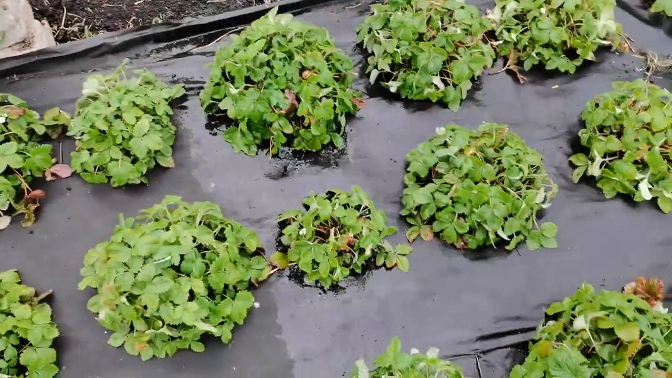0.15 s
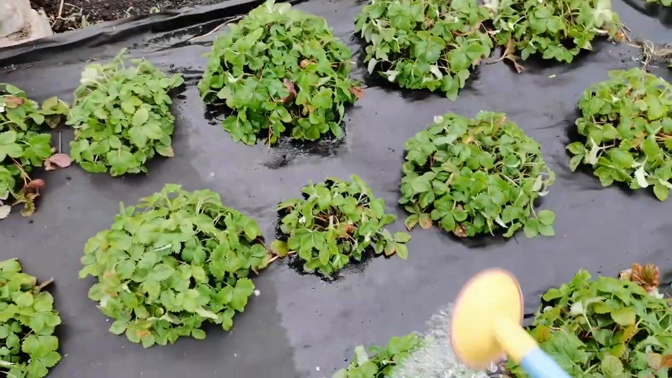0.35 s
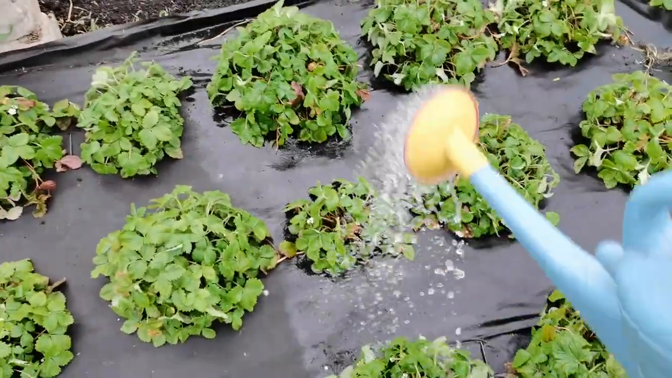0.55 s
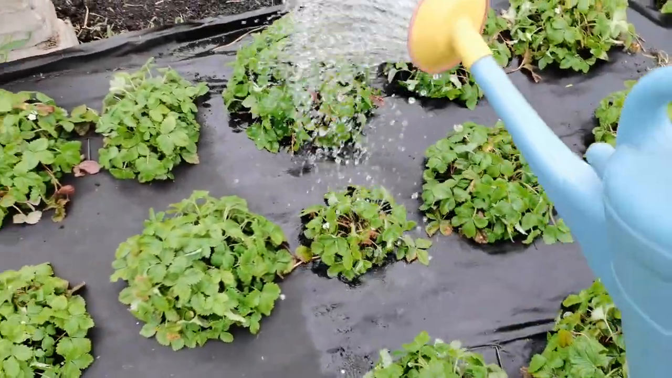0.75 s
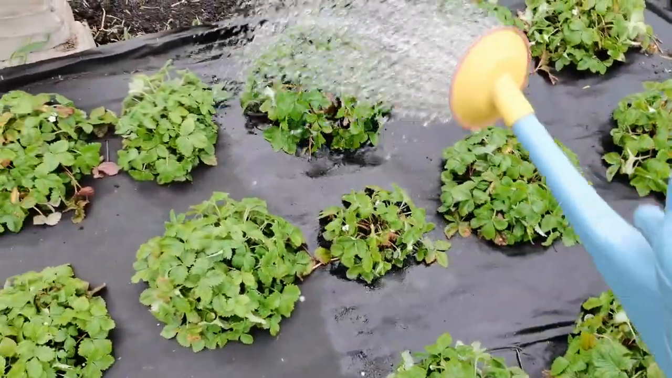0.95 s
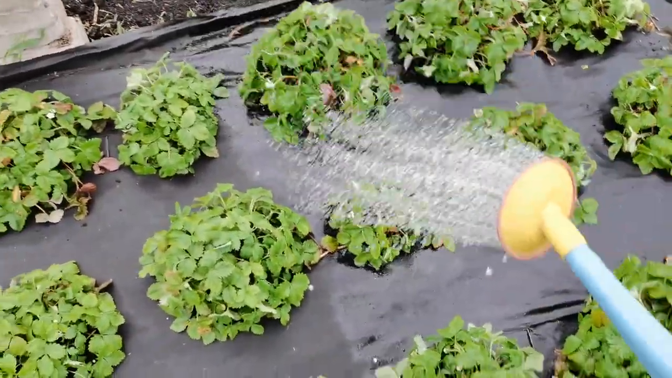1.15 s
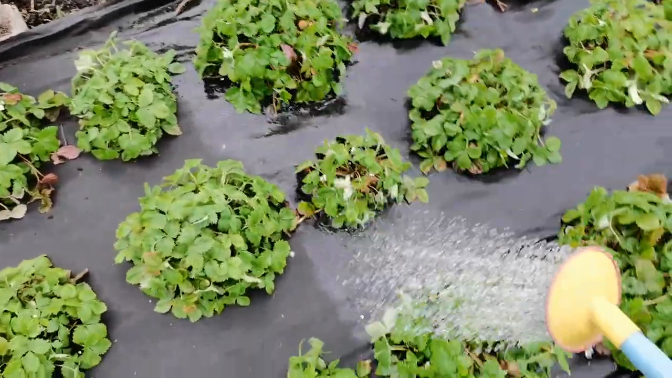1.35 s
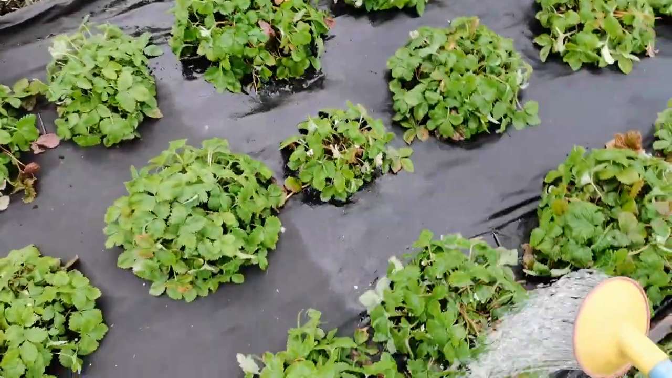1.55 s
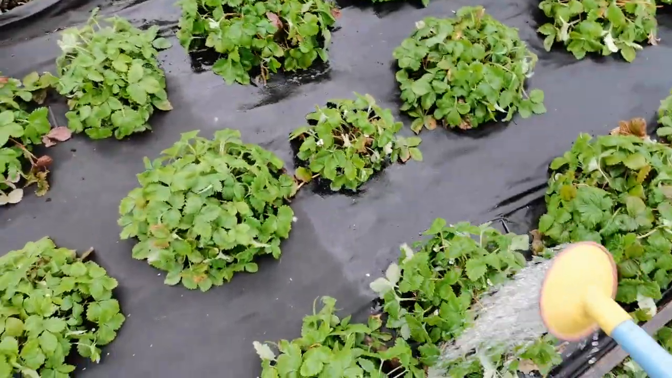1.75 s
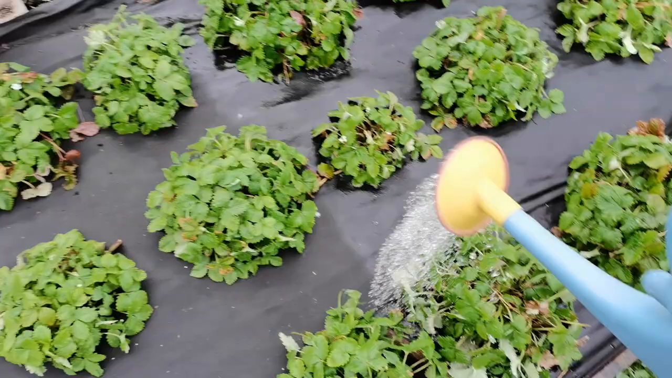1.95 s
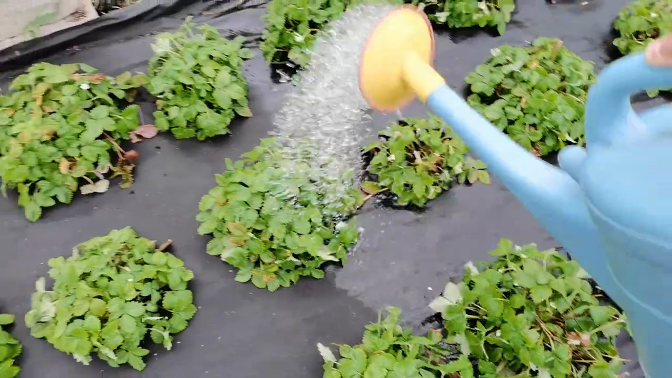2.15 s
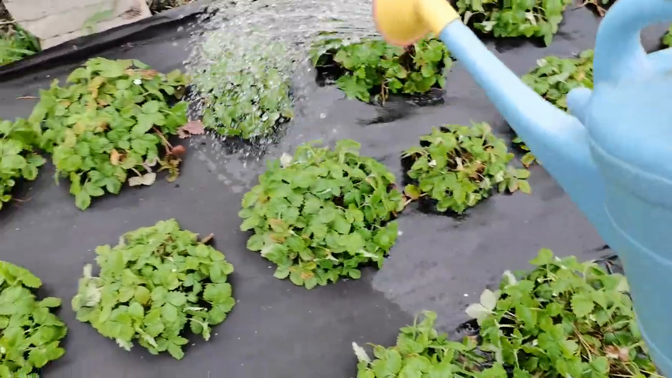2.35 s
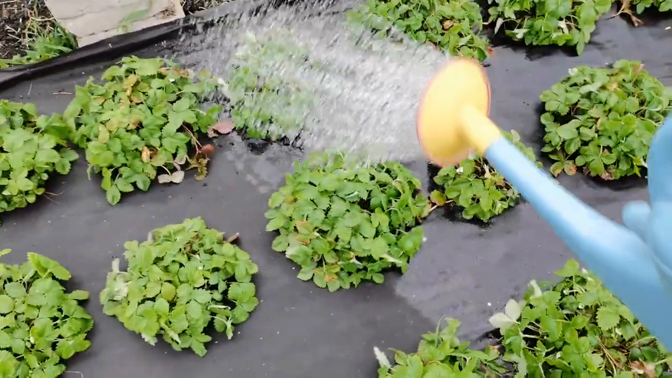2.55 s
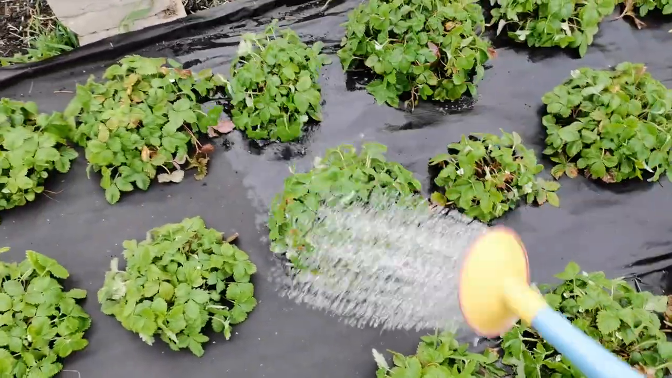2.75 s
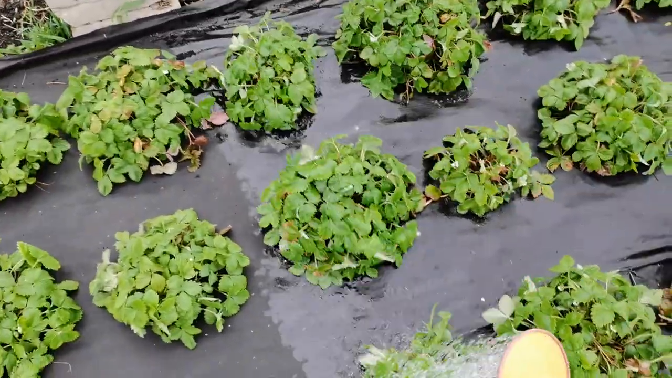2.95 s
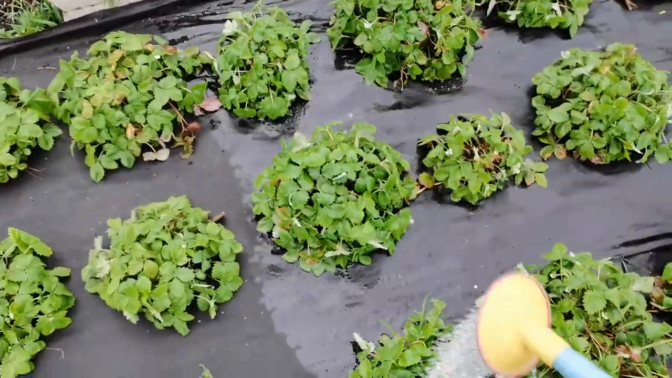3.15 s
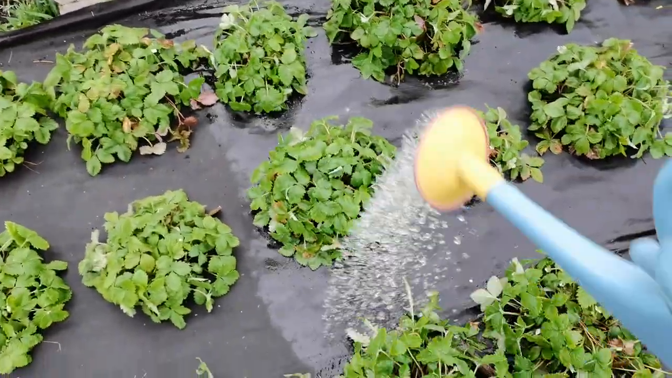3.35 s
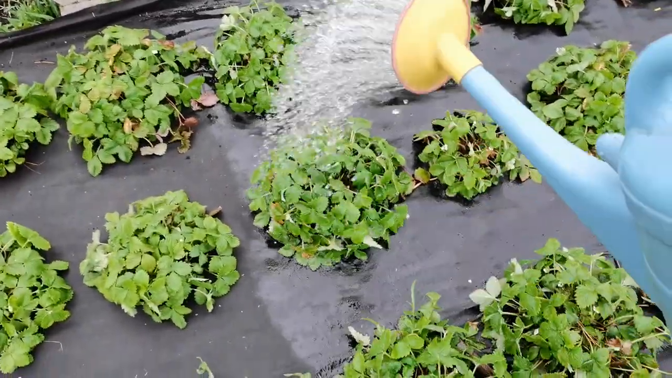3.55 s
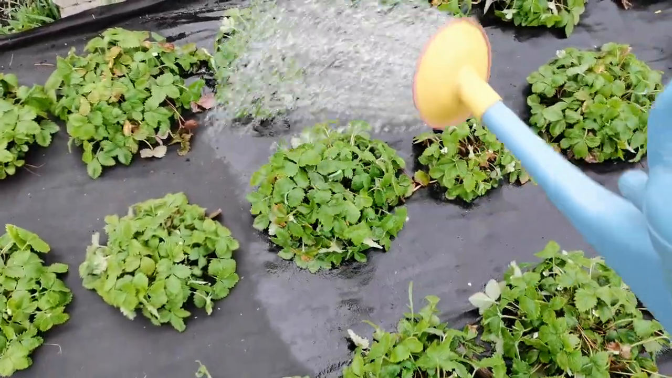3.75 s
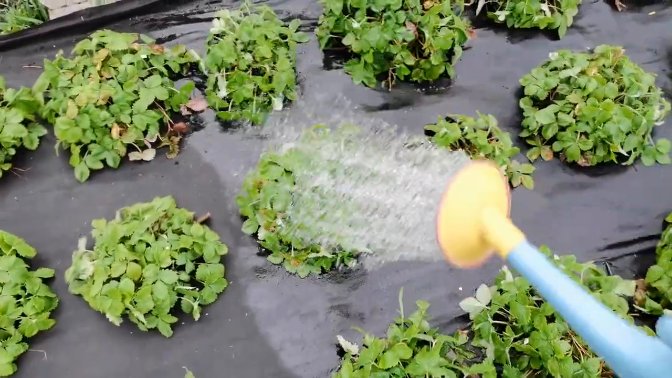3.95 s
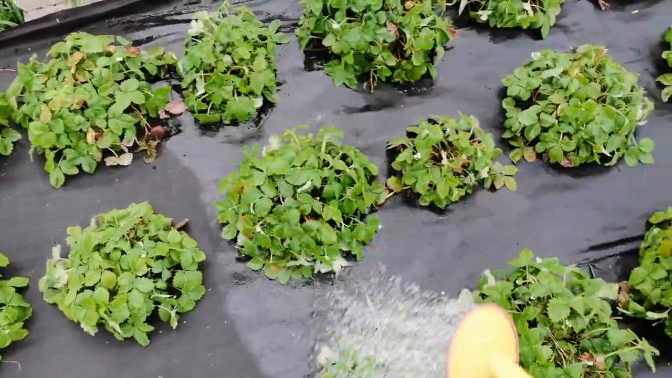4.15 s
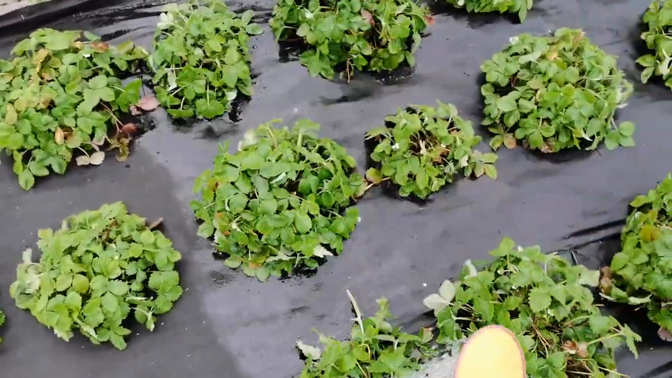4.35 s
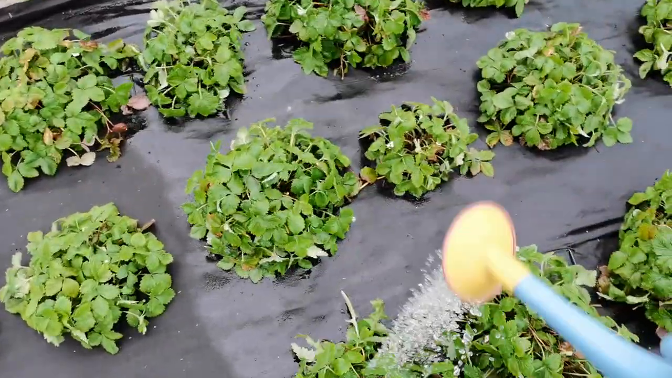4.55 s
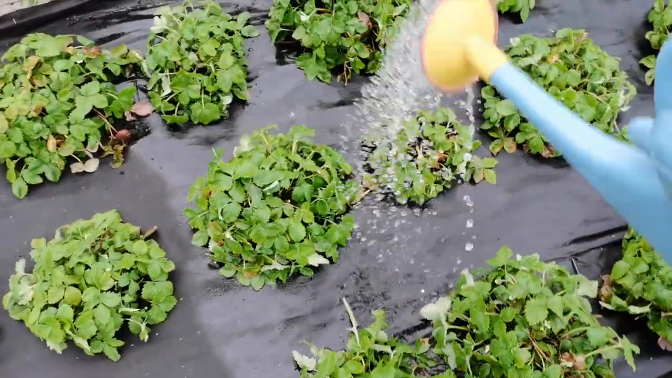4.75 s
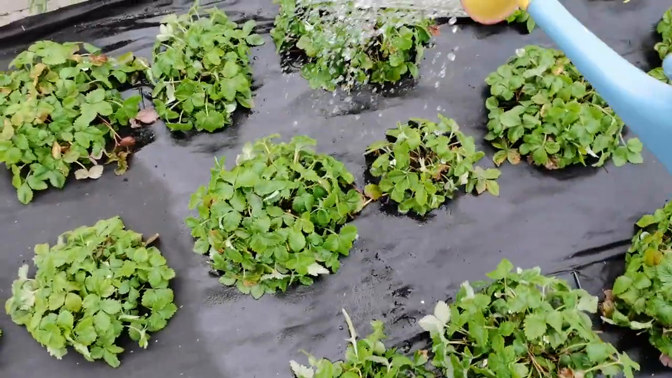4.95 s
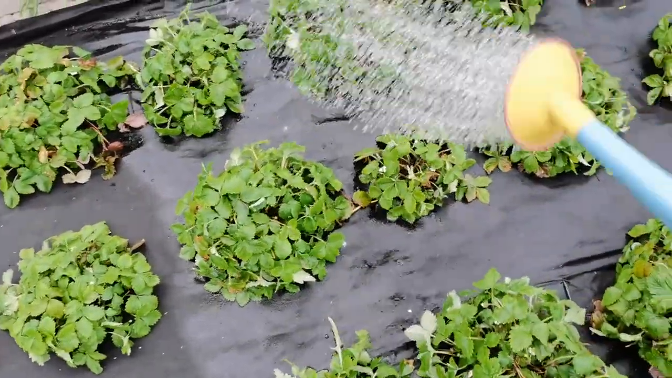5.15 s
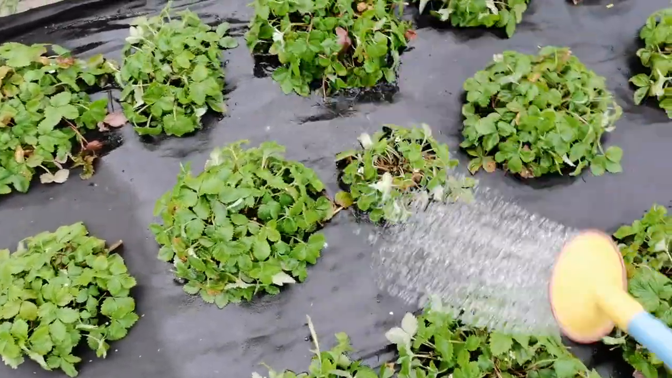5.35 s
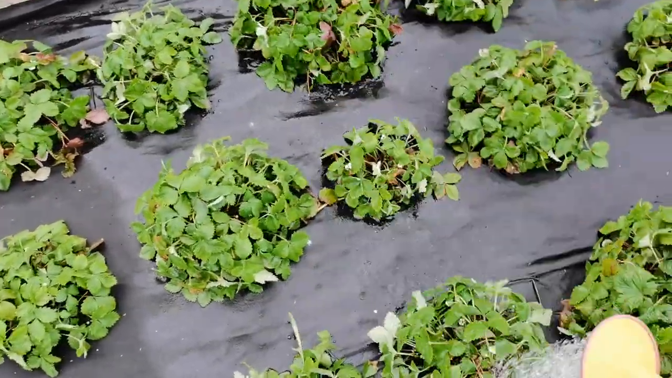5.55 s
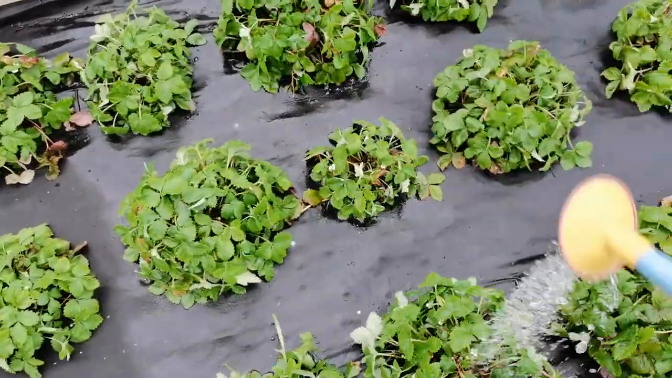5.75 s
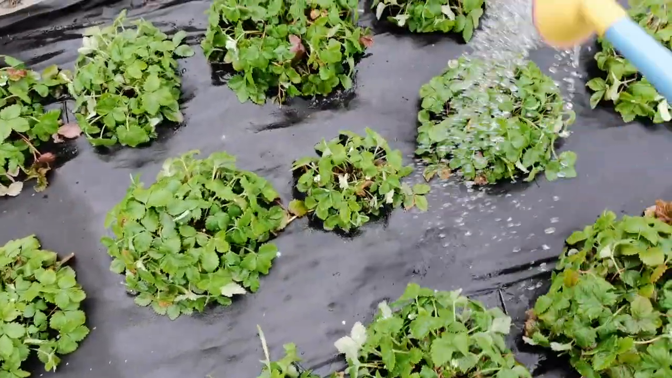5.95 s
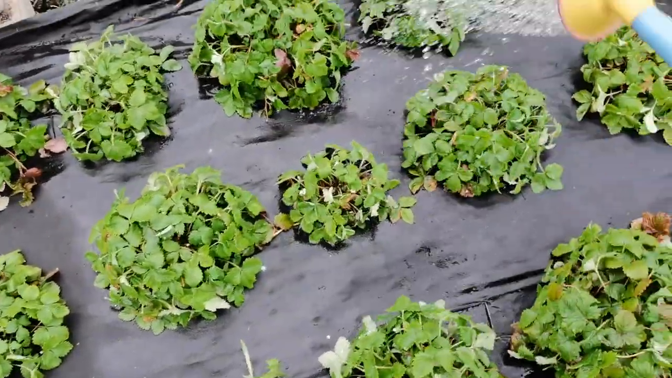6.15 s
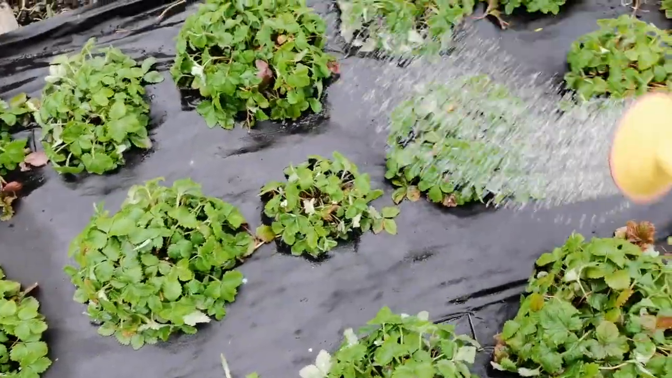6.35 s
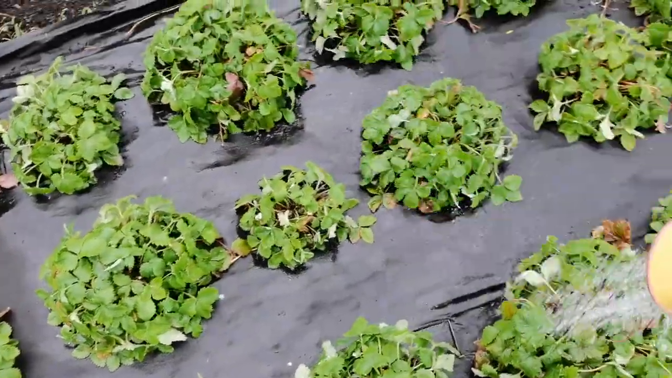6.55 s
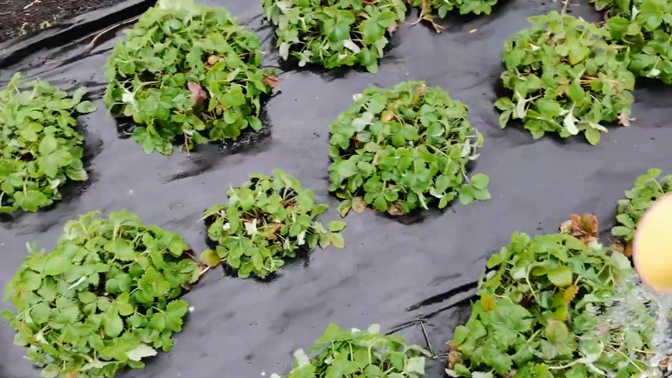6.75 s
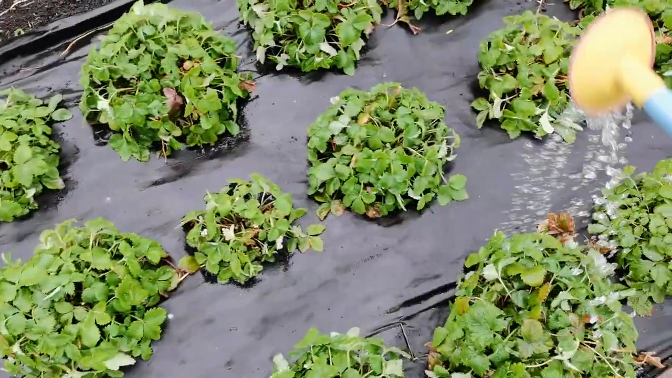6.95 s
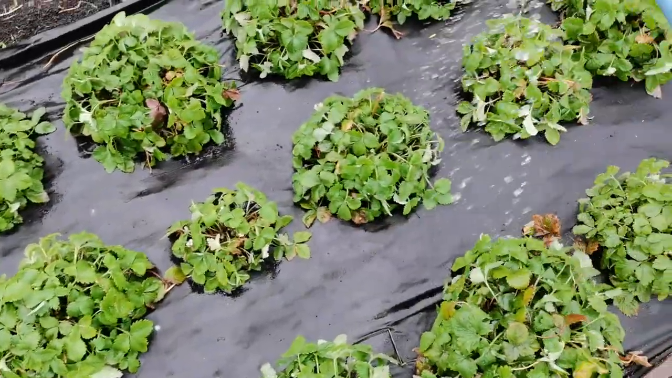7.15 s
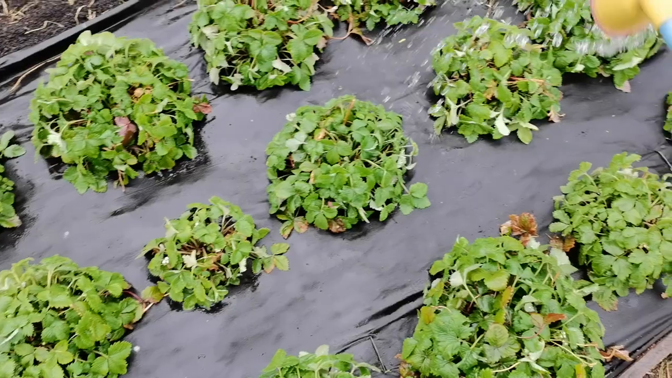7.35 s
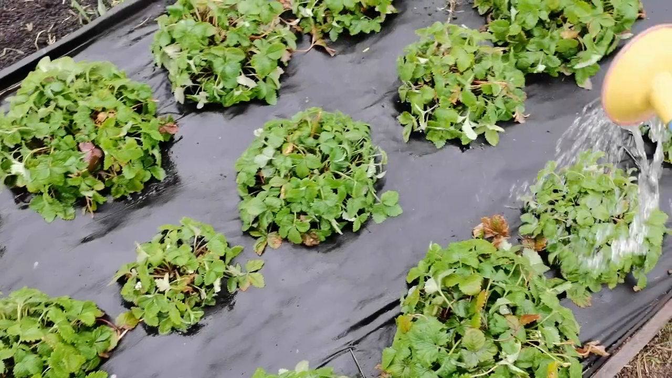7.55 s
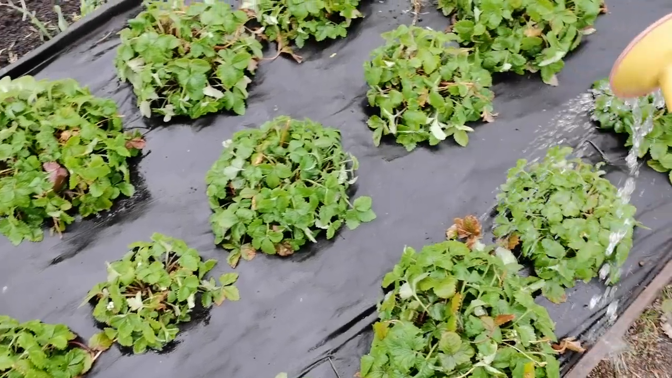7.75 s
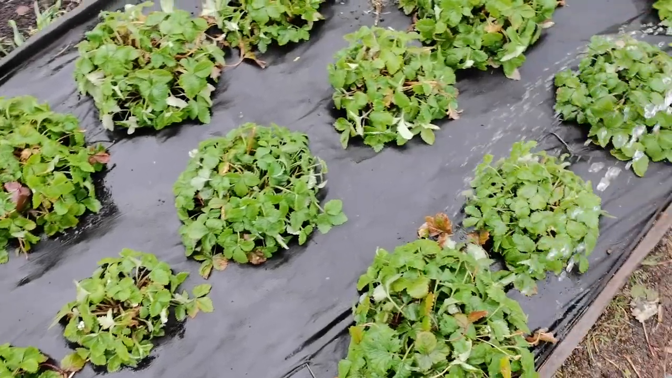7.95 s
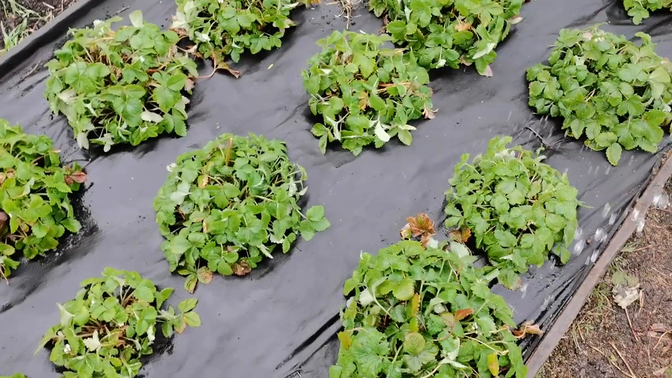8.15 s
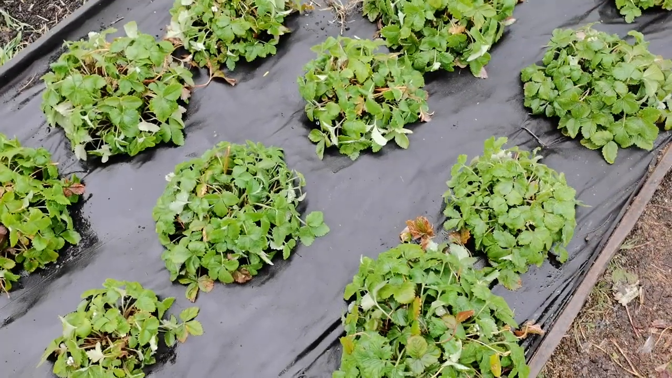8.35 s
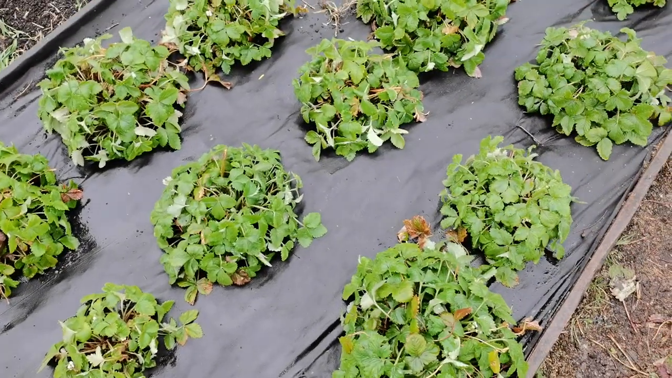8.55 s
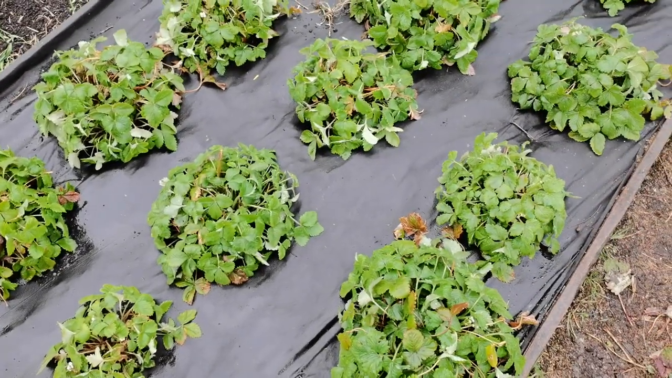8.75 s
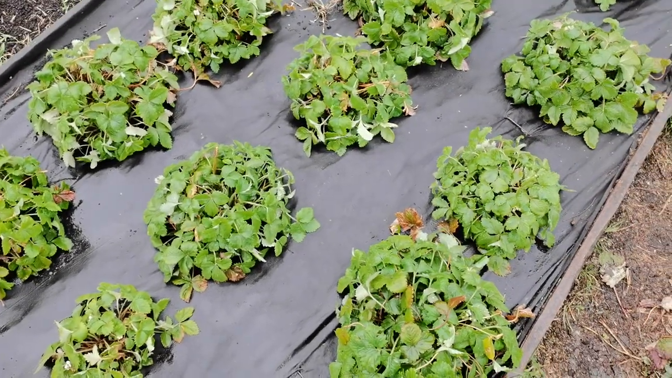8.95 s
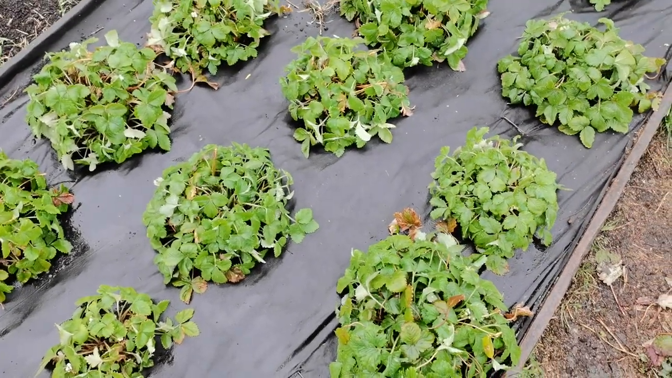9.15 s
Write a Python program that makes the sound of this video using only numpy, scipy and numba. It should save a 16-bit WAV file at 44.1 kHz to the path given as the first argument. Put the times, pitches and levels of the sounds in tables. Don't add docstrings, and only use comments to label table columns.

```python
import sys
import numpy as np
from scipy import signal
from scipy.fft import rfft, irfft, next_fast_len
from scipy.io import wavfile
from scipy.ndimage import map_coordinates
from numba import njit

SR = 44100
rng = np.random.default_rng(int(sys.argv[2]) if len(sys.argv) > 2 else 0)


def ratio_of_db(decibels):
    return 10 ** (np.asarray(decibels, float) / 20)


def output_pcm(signal):
    pcm = np.clip(np.atleast_2d(signal).T, -1, 1) * 32767
    wavfile.write(sys.argv[1], SR, np.round(pcm).astype(np.int16))


N = 409688

# [start t/s, length/s, drumming level/dB, swell over the pass/dB,
# puddle splash over drumming/dB]
FABRIC_PASSES = [(-.02, 0.026, -41, 0, -10), (0.446, 0.22, -37.5, -0.5, -17), (0.7, 0.61, -44, 11.5, -12),
                 (1.355, 0.021, -35.5, -4, -12.5), (1.984, 0.12, -33, -1, -15),
                 (2.269, 0.071, -35.5, 2, -12), (2.439, 0.18, -44, 12.5, -12),
                 (2.65, 0.23, -32, -6.5, -12.5), (2.852, 0.087, -26, -5.5, -13.5),
                 (3.355, 0.071, -35.5, 0.5, -19), (3.612, 0.38, -38.5, 4.5, -13),
                 (4.06, 0.14, -33, -1.5, -16), (4.657, 0.12, -35, -1.5, -21), (4.872, 0.1, -37, -2.5, -16),
                 (5.095, 0.3, -39.5, 8, -13), (5.842, 0.15, -45, 8, -18), (6.079, 0.048, -41.5, 7, -6.5),
                 (6.192, 0.19, -42, 12, -13), (6.409, 0.11, -38.5, 0, -11), (7.075, 0.23, -64.5, 18, -4),
                 (7.381, 0.21, -45, -5, -10), (7.63, 0.12, -43.5, -6.5, -11.5),
                 (7.819, 0.22, -51, 4.5, -8.5), (8.126, 0.12, -50, -2, -10.5),
                 (8.815, 0.34, -60.5, -4.5, -2.5)]
# [start t/s, length/s, crackle level/dB, swell over the pass/dB]
LEAF_PASSES = [(.45, 0.074, -58, -6), (.65, 0.011, -63, -28), (.9, 0.25, -46.5, 0.5),
               (1.13, .04, -38.5, 7.5), (1.28, 0.068, -38, 3.5), (1.5, 0.16, -60.5, 9.5),
               (1.97, 1, -53, -9), (2.42, 0.18, -63.5, 25), (2.64, 0.36, -44, -16),
               (2.86, 0.045, -43.5, 4.5), (2.98, 0.18, -53, 0), (3.35, 0.14, -50, -2),
               (3.71, 0.27, -46.5, 9.5), (4.08, 0.1, -36.5, -0.5), (4.2, 0.26, -49, -6.5),
               (4.65, 0.086, -57, 7), (4.9, 0.13, -59, 10.5), (5.1, 0.19, -41, 3), (5.36, 0.05, -40.5, 8.5),
               (5.97, 0.031, -52, 0.5), (6.27, 0.11, -44, 8), (6.44, 0.096, -42.5, 3.5),
               (7.41, 0.2, -53.5, 9.5), (7.62, 0.15, -49.5, -3), (7.83, 0.073, -59, 1),
               (8.35, 0.37, -62, 2)]
# [t/s, level on fabric/dB, level from leaves/dB]
RUNOFF = [(0, -60.5, -57), (1.47, -58, -56.5), (1.58, -55, -67), (1.8, -61, -57.5), (3.2, -103, -68.5),
          (4.5, -57, -59), (5.7, -57, -60), (6.7, -72, -57.5), (8.4, -67.5, -71.5), (9.29, -83, -77)]
# [f/Hz, level per Hz/dB]
FABRIC_COLOUR = [(35, -106), (60, -17.5), (170, -1.5), (260, 0), (400, 1.5), (600, -1), (850, -8.5),
                 (1050, -16.5), (1300, -26), (1800, -39), (2600, -42)]
# [f/Hz, level per Hz/dB]
SPLASH_COLOUR = [(650, -51), (1100, 3), (1500, 9), (2200, 4), (3200, 1), (4200, -8), (5500, -26),
                 (9000, -51)]
# [f/Hz, level per Hz/dB]
LEAF_COLOUR = [(2060, -40), (3500, 1.5), (4680, 0), (5120, 0), (6900, 0.5), (8130, 7), (9250, 8.5),
               (10500, 4), (13400, 3.5), (15800, -7), (16300, -76)]
FAR_TURNS = [.95, 2.47, 3.75, 5.04, 6.2]
# [t/s, f/Hz]
ECHO_NOTCH = [(.3, 615), (1.3, 565), (4.7, 623), (5.4, 568), (5.9, 627), (7.3, 502), (8.0, 553),
              (8.55, 608), (8.85, 1060)]
# [t/s, delay/ms]
LANDING = [(0, .05), (.8, -.03), (1.3, 0), (2.05, .045), (2.7, -.01), (3.4, .04), (3.9, 0), (4.8, .06),
           (5.25, .03), (6.4, .04), (7.2, .09), (7.9, .14), (8.5, .27), (9.29, .29)]
# [f/Hz, level per Hz/dB]
HUM_COLOUR = [(12, -33), (20, -12.5), (96, 0), (359, -5.5), (630, -7.5), (959, -7), (1340, -13.5),
              (4240, -16.5), (4880, -26), (7030, -26), (9040, -20), (15000, -37.5), (16300, -10)]
# [t/s, level/dB]
HUM_LEVEL = [(0, -54), (4, -51), (8, -58), (9.29, -60.5)]
# [t/s, peak level/dB, f/Hz, length/s, pitch rise as a share]
GULPS = [(.002, -37.5, 126, 0.025, 0.31), (0.046, -42.5, 218, 0.049, 1), (0.062, -52, 747, 0.075, 0.67),
         (0.539, -25, 251, 0.012, -0.004), (.552, -27.5, 784, 0.015, 0.19), (0.555, -23, 233, 0.026, 0.5),
         (0.613, -20, 920, 0.0098, -0.18), (0.621, -19.5, 224, 0.045, 0.17),
         (1.512, -44, 254, 0.042, -0.061), (1.645, -47.5, 163.6, 0.044, 0.068),
         (1.68, -42.5, 166.5, 0.054, -0.095), (1.862, -30, 1600, 0.0074, -0.017),
         (2.964, -21.5, 189, 0.014, -0.56), (2.983, -31.5, 168.5, 0.048, -0.26),
         (3.553, -34, 703, 0.023, 0.066), (3.606, -26, 172, 0.056, -0.17),
         (5.082, -15.5, 1740, 0.0085, 0.059), (6.063, -29, 1514, 0.015, 0.029),
         (6.089, -35, 1480, 0.013, 0.49), (6.1, -27.5, 733, 0.018, 0.023), (6.102, -25.5, 2370, 0.015, 0),
         (6.104, -22, 1670, .012, -0.51), (6.12, -35, 2180, 0.015, -0.0043),
         (9.038, -59, 980, 0.076, -0.033), (9.193, -58.5, 560, 0.031, 0.063),
         (9.222, -58.5, 602, .06, 0.27)]
# t/s, body level/dB, crack level/dB
KNOCK = (0.421, -6, -18)
# [f/Hz, level/dB, time to fade by 60 dB/s]
CAN_TONES = [(199.4, -3, 0.18), (146, -12.5, 0.31), (407, -8.5, 0.074), (930, -21.5, 0.13),
             (2560, -35, 0.064), (2830, -18, 0.075), (2910, -23.5, 0.085), (2980, -23, 0.037),
             (3105, -20, 0.11), (3470, -29.5, 0.18), (3550, -8.5, 0.038), (3900, -40, 0.05),
             (4570, -31, 0.062), (5850, -21, 0.067)]
# [f/Hz, level/dB]
RATTLE_COLOUR = [(1000, -5), (3200, 2), (4400, -8), (6000, -6), (8500, -0.5), (14000, -5.5)]
# [t/s, peak level/dB, f/Hz]
LEAF_TICKS = [(0.514, -27, 9200), (0.659, -27, 8800), (0.794, -15.5, 9900), (0.813, -23.5, 9200),
              (0.854, -29, 8340), (0.868, -20.5, 8200), (1.0271, -17, 11500), (1.098, -31, 8450),
              (1.1323, -15, 8690), (1.1442, -13, 8500), (1.2396, -38, 9050), (1.2811, -32, 8810),
              (1.314, -7, 6050), (1.4229, -18, 8060), (1.784, -26, 8000), (1.968, -26.5, 8400),
              (2.1256, -19.5, 4730), (2.5841, -19, 9400), (2.6125, -32, 9100), (2.6894, -14.5, 10200),
              (2.83, -20, 8800), (2.863, -22, 8350), (2.8854, -15, 10100), (2.9592, -17, 9100),
              (3.113, -26, 9050), (3.3035, -27, 8400), (3.3304, -21, 7900), (3.3578, -19, 11100),
              (3.3938, -12, 9800), (3.4493, -17, 9600), (3.6167, -24.5, 8200), (3.7017, -19, 9800),
              (3.7225, -36, 12000), (3.7759, -23, 9110), (3.8801, -19, 8100), (3.9184, -11.5, 8260),
              (3.953, -12, 11500), (4.0282, -20, 8850), (4.123, -22, 5840), (4.0945, -15, 8400),
              (4.6539, -29, 8920), (4.6677, -15, 9400), (4.7093, -22, 4570), (4.942, -18, 9800),
              (5.0742, -18, 9640), (5.0929, -22, 8750), (5.2021, -39, 9190), (5.2323, -10.5, 8600),
              (5.3583, -18, 9350), (5.91, -31, 10000), (6.3296, -36, 9280), (6.38, -15, 4200),
              (6.461, -17, 8300), (6.4957, -23, 9200), (6.508, -6, 9300), (6.5301, -33, 8400),
              (6.8112, -21, 8700), (6.8973, -27, 9790)]
# [t/s, peak level/dB, f/Hz]
MORE_LEAF_TICKS = [(2.24, -43, 9500), (2.9, -22, 6500), (0.895, -34, 6600), (7.644, -29, 4950),
                   (7.751, -37, 6500), (8.741, -31.5, 3120), (7.1735, -23.5, 9200), (7.407, -22, 7000),
                   (7.4374, -19, 5300), (7.4662, -18, 5170), (7.517, -20, 9700), (7.607, -21, 4750),
                   (7.665, -23, 9300), (7.7175, -18.5, 8400), (7.832, -24, 9100), (7.8848, -19, 6500),
                   (7.929, -19.5, 9200), (8.019, -25, 9100), (7.911, -27, 10000), (7.934, -22, 4460),
                   (8.011, -32, 8800), (8.095, -14, 9200), (8.098, -42, 5900), (8.105, -28, 8500),
                   (8.24, -32, 9600), (8.293, -38, 8200), (8.934, -59, 7000), (8.992, -48, 6540),
                   (9.123, -46, 5860), (8.2234, -22, 9900), (8.364, -25.5, 11000), (8.3918, -28, 8400),
                   (8.48, -29.5, 8400), (8.607, -35, 6450), (8.739, -32.5, 8400)]
# [f/Hz, level/dB]
LEAF_BODY = [(1500, -30), (3000, -12), (4300, 0), (16000, 0)]
# [t/s, peak level/dB, f/Hz]
SLAPS = [(0.725, -28.5, 870), (1.05, -31, 705), (1.389, -39, 988), (2.297, -38, 730), (2.679, -32, 624),
         (3.751, -38, 800), (4.879, -32, 665), (5.359, -32.5, 710), (5.974, -40, 676), (6.268, -30, 576),
         (7.663, -34, 850), (7.832, -47, 813), (7.859, -45, 877), (7.91, -41, 980)]
# [t/s, peak level/dB, f/Hz]
SMACKS = [
    (1.3140, -20, 5800),
    (5.2323, -17, 8300),
    (6.508, -18, 8800),
    (8.0943, -15, 8300),
    (8.0948, -22, 5500),
    (8.0965, -21, 9500),
]
# [t/s, level/dB, lowest f/Hz]
TRICKLE = [
    (1.53, -69, 2200),
    (1.585, -56.5, 2400),
    (1.63, -57.5, 2600),
    (1.7, -63, 2410),
    (1.78, -72, 2230),
]
# [t/s, level/dB, lowest f/Hz]
SPUTTER = [
    (7.0, -69, 2200),
    (7.064, -55, 1730),
    (7.1, -55.5, 1600),
    (7.23, -54, 1600),
    (7.286, -52, 2200),
    (7.36, -57, 2380),
]
# [t/s, peak level/dB, f/Hz]
GLUGS = [(7.0268, -40, 2250), (7.042, -45, 2170), (7.0604, -36, 2100), (7.072, -42, 1630),
         (7.0818, -50, 1540), (7.0964, -47, 1430), (7.112, -45, 1570), (7.1297, -40, 1700),
         (7.1444, -37, 1640), (7.162, -45, 1510), (7.1854, -42, 1580), (7.2, -35, 1610),
         (7.2154, -44, 1560), (7.2447, -35, 1620), (7.2585, -32.5, 2130), (7.2709, -32, 2790),
         (7.2887, -35, 2260), (7.2984, -41, 2710), (7.312, -40, 2180), (7.3344, -43, 2180)]
# [t/s, level/dB, left over right/dB, length/s]
PUFFS = [
    (1.79, -47.5, 23, 0.29),
    (5.658, -41, 24, 0.11),
    (6.617, -52, 14, 0.095),
    (6.822, -36, 25, 0.14),
    (7.6, -45, -10, 0.043),
    (8.64, -35, -29, 0.068),
    (8.82, -54.5, -6, .45),
    (8.002, -62, 2, 0.71),
]
# [f/Hz, level per Hz/dB]
WIND_COLOUR = [(15, -21), (40, 16.5), (80, 14), (150, -4), (300, -29)]
# [t/s, thump level/dB, splash over thump/dB]
FAT_DROPS = [(7.399, -27, -3), (7.511, -36, 2), (7.533, -23, -18), (7.552, -18.5, -14), (7.614, -24, -16),
             (7.619, -14, -23), (7.63, -14.5, -13), (7.644, -26, -20), (7.834, -19, -23), (7.885, -20, -10),
             (7.954, -27, -22), (8.056, -26, -7), (8.151, -32, -7), (8.254, -22.5, -14), (8.913, -47, -10),
             (8.897, -26, -7), (7.66, -35, -32), (7.693, -18, -39), (7.806, -20, -18), (7.856, -27, -3.5),
             (7.91, -15, -15), (7.932, -18.5, -15), (8.018, -17.5, -3.5), (8.089, -21.5, -31),
             (8.131, -22.5, -31), (8.161, -22, -3), (8.196, -19, -40), (8.24, -32, -28), (8.479, -32, -14),
             (8.524, -18, -15.5), (8.547, -25, -33), (8.569, -19.5, -9), (8.58, -16.5, -23),
             (8.593, -18.5, -11), (8.632, -29, -5), (8.774, -28.5, -18), (8.801, -27, -30),
             (8.83, -24, -23), (8.866, -33.5, 5), (8.889, -26, -4), (8.883, -40, 8), (8.903, -26, 0),
             (8.933, -23.5, 0.5), (8.975, -27.5, -2), (8.99, -22.5, 2.5), (9.017, -24.5, -16),
             (9.034, -33, -1), (9.075, -53, -4), (9.087, -39, 8), (9.123, -36.5, 7), (9.18, -51, -2),
             (7.979, -18, -10), (8.184, -21, -10)]
# [f/Hz, level/dB]
LONE_COLOUR = [(120, -1), (450, -2), (1200, -1.5), (2600, -6)]
# [f/Hz, left over right/dB]
PORT_BALANCE = [(60, 3), (110, 4), (200, 1), (380, 0), (700, 0.5), (1290, -1.5), (2380, 0), (4400, -0.5),
                (8120, -6), (15000, 3)]
# [f/Hz, phase/radians]
PORT_LEAD = [(60, -0.3), (260, -0.27), (800, -0.12), (1600, 0.1), (3000, 0.1)]


def unit(x):
    return x / np.sqrt(np.mean(x ** 2) + 1e-20)


def along(points, hz):
    f, value = np.transpose(points)
    return np.interp(np.log(hz + 1), np.log(f + 1), value)


def over_time(rows):
    s, *columns = np.transpose(rows)
    return [np.interp(np.arange(N) / SR, s, column) for column in columns]


def coloured(x, spectrum):
    size = 2 ** 13
    level_db = along(spectrum, np.fft.rfftfreq(size, 1 / SR))
    cepstrum = irfft(np.log(ratio_of_db(level_db) + 1e-5))
    cepstrum[1:size // 2] *= 2
    cepstrum[size // 2 + 1:] = 0
    response = irfft(np.exp(rfft(cepstrum)))[None, :size // 2]
    return signal.fftconvolve(np.float32(x), np.float32(response), axes=1)[:, :N]


def wobble(rate):
    samples = np.arange(0, N, 32)
    coarse = map_coordinates(rng.standard_normal(N // 400), [samples * rate / SR])
    return np.interp(np.arange(N), samples, coarse)


def mix(s, sound):
    out, at = np.zeros((2, N)), round(s * SR)
    out[:, at:at + sound.shape[-1]] = sound
    return out


def aside(x, late_ms):
    left = map_coordinates(x[0], [np.arange(N) - late_ms * SR / 1000], mode="nearest")
    return np.array([left, x[1]])


@njit
def add(out, at, lag, gain, step, cycles):
    for g in range(len(at)):
        turn = np.exp(step[g] * (2j * np.pi - 1 / cycles))
        z = np.sqrt(turn)
        for i in range(at[g], min(at[g] + int(4 * cycles / step[g]), out.shape[1] - 50)):
            out[0, i] += gain[0, g] * z.imag
            out[1, i - lag[g]] += gain[1, g] * z.imag
            z *= turn


def grains(at, gain, hz, cycles, lag_s):
    out, place = np.zeros((2, N)), rng.logistic(size=len(at))
    lag = np.clip(np.round(lag_s * SR * place), -40, 40).astype(np.int64)
    step = np.clip(hz, 30, 20000) / SR
    add(out, np.clip(at, 50, N - 60), lag, gain * np.ones((2, 1)), step, float(cycles))
    return out


def far():
    width_s = 0.34
    return sum(np.exp(-((np.arange(N) / SR - s) / width_s) ** 2) for s in FAR_TURNS)


def off_ground(x):
    notch_hz = over_time(ECHO_NOTCH)[0] * (1 - 0.23 * far())
    late = np.arange(N) - SR / (2 * notch_hz)
    return x + np.array([np.interp(late, np.arange(N), channel) for channel in x])


def passes(rows, rise, fall, under_db, plus_db=0):
    t = np.arange(0, N, 32) / SR
    s, length, db, swell_db = np.transpose(rows)[:4, :, None]
    late = t - s
    swell = swell_db * np.clip(late / length, 0, 1)
    edges = rise * np.minimum(late, 0) - fall * np.maximum(late - length, 0)
    power = np.sum(ratio_of_db(2 * (db + plus_db + swell + edges)), axis=0)
    return 10 * np.log10(np.interp(np.arange(N) / SR, t, power) + ratio_of_db(2 * under_db))


def flow():
    fabric_rise, fabric_fall, leaf_rise, leaf_fall = 245, 296, 230, 227
    ground_db, plant_db = over_time(RUNOFF)
    drum_db = passes(FABRIC_PASSES, fabric_rise, fabric_fall, ground_db)
    leaf_db = passes(LEAF_PASSES, leaf_rise, leaf_fall, plant_db)
    trickle_db = 10 * np.log10(ratio_of_db(2 * (ground_db - 8)) + ratio_of_db(2 * (leaf_db - 15)))
    splash_over_db = np.transpose(FABRIC_PASSES)[4][:, None]
    splash_db = passes(FABRIC_PASSES, fabric_rise, fabric_fall, trickle_db, splash_over_db)
    boom_db = -53.5 + 0.36 * (drum_db + 27.0) + 8 * far() + 4.5 * wobble(4.9)
    return drum_db, boom_db, splash_db, leaf_db


def shower(level_db, lo_hz, hi_hz, count, full_db, thinning, spread_db, clump_db, mist, apart):
    clump_rate = 30
    when, keep, size, pitch, sign = rng.random((count, 5)).T
    at = (when * N).astype(np.int64)
    share = np.clip(ratio_of_db(thinning * (level_db - full_db)), .01, 1)
    weight = np.clip((share[at] - keep) * 50, 0, 1) / np.sqrt(share[at])
    hz = lo_hz * (hi_hz / lo_hz) ** pitch
    strength = np.minimum(ratio_of_db(-max(spread_db, 2) * np.log(size)), 5)
    blow = weight * hz * strength * np.sign(sign - .5)
    low_clumps = np.cos(pitch * np.pi / 2) * wobble(clump_rate)[at]
    high_clumps = np.sin(pitch * np.pi / 2) * wobble(clump_rate)[at]
    blow = blow * ratio_of_db(clump_db * (low_clumps + high_clumps))
    noise = rng.standard_normal((3, N))
    haze = unit(noise[0] + apart * noise[1:])
    haze_gain = mist * share ** 0.067 * ratio_of_db(.5 * clump_db * wobble(clump_rate))
    return at, blow, hz, haze_gain * haze


def patter(level_db, spectrum, cycles, lag_s, **rule):
    at, blow, hz, mist = shower(level_db, **rule)
    return unit(coloured(unit(grains(at, blow, hz, cycles, lag_s)) + mist, spectrum))


def spray():
    drum_db, boom_db, splash_db, leaf_db = flow()
    drum = patter(drum_db, FABRIC_COLOUR, 0.34, 2.5e-5, lo_hz=180, hi_hz=1600, count=24000,
                  full_db=-34, thinning=0.643, spread_db=-2.0, clump_db=1.0, mist=1.0, apart=0.66)
    splash = patter(splash_db, SPLASH_COLOUR, 6.9, 3.5e-5, lo_hz=958, hi_hz=5010, count=40000,
                    full_db=-47.5, thinning=0.818, spread_db=-2.0, clump_db=1.5, mist=0.6, apart=1.0)
    leaves = patter(leaf_db, LEAF_COLOUR, 4.5, 1.5e-4, lo_hz=3306, hi_hz=17500, count=40000,
                    full_db=-48.0, thinning=0.784, spread_db=1.0, clump_db=5, mist=0.6, apart=3.7)
    boom = signal.sosfiltfilt(signal.butter(2, 240, fs=SR, output="sos"), drum)
    skin = unit(off_ground(drum - boom))
    fabric = ratio_of_db(drum_db) * skin + ratio_of_db(boom_db) * unit(boom)
    return fabric + ratio_of_db(splash_db) * splash + ratio_of_db(leaf_db) * leaves


def garden_hum():
    noise = rng.standard_normal((3, N))
    level_db = over_time(HUM_LEVEL)[0] + 0.5 * wobble(3.184)
    return unit(coloured(0.5 * noise[0] + noise[1:], HUM_COLOUR)) * ratio_of_db(level_db)


def can_gulps():
    out = np.zeros((2, N))
    for s, db, hz, length, rise in GULPS:
        u = np.arange(0, 1, 1 / (length * SR))
        swell = np.sqrt(np.sin(np.pi * u ** 0.5))
        turns = hz * length * (u + rise * (u * u - u) / 2)
        out += mix(s, ratio_of_db(db) * swell * np.sin(2 * np.pi * turns))
    return out


def can_knock():
    s, body_db, crack_db = KNOCK
    t = np.arange(SR // 4) / SR
    ring = sum(ratio_of_db(db - 60 * t / t60) * np.sin(2 * np.pi * hz * t) for hz, db, t60 in CAN_TONES)
    ring = ring * (1 - np.exp(-t / 0.0038))
    push = (t / 0.0076) ** 2 * np.exp(2 - 2 * t / 0.0083)
    boom = ratio_of_db(-2.0) * push * np.sin(2 * np.pi * 225 * t)
    fade = ratio_of_db(-60 * t / 0.004) + ratio_of_db(-0.5 - 60 * t / 0.16)
    crack = rng.standard_normal((2, len(t))) * fade
    rattle = coloured(mix(s, ratio_of_db(crack_db) * crack), RATTLE_COLOUR)
    return mix(s, ratio_of_db(body_db) * (ring + boom)) + rattle


def drops_on_leaves():
    burst_s = .003
    stray = rng.random((60, 3)) * [8.4, 9, 4000] + [0, -54, 6500]
    ticks = np.r_[LEAF_TICKS, MORE_LEAF_TICKS, stray]
    pan_db = rng.normal(0, 1.5, len(ticks))
    s, db, hz, pan_db = np.repeat(np.c_[ticks, pan_db], 8, axis=0).T
    late = rng.random(len(s)) ** 3
    size_db, pitch = rng.normal(0, 1.5, len(s)), rng.normal(0, .22, len(s))
    gain = ratio_of_db(db - 17.0 + size_db - 5.2 * late + pan_db * np.array([[.5], [-.5]]))
    at = ((s + burst_s * late) * SR).astype(np.int64)
    return coloured(grains(at, gain, hz * np.exp(pitch), 9, 8e-5), LEAF_BODY)


def pops(rows, cycles, spread, smear_s, plus_db):
    s, db, hz = np.repeat(rows, 4, axis=0).T
    late, pitch = rng.random((len(s), 2)).T
    at = ((s + smear_s * late) * SR).astype(np.int64)
    return grains(at, ratio_of_db(db + plus_db), hz * np.exp(spread * (pitch - .5)), cycles, 1.5e-5)


def gouts():
    slaps = pops(SLAPS, cycles=4.3, spread=0.23, smear_s=.0015, plus_db=-5)
    smacks = pops(SMACKS, cycles=4, spread=.5, smear_s=.0008, plus_db=-4)
    return slaps + smacks


def fizz(rows, count, crowding):
    fizz_db, fizz_hz = over_time(rows)
    when, pitch, size = rng.random((count, 3)).T
    start, end = rows[0][0], rows[-1][0]
    at = ((start + when * (end - start)) * SR).astype(np.int64)
    hz = fizz_hz[at] * 0.915 * 1.9 ** pitch ** crowding
    big_db = np.minimum(-4 * np.log(size), 13) + 2 * wobble(80)[at]
    return grains(at, ratio_of_db(fizz_db[at] - 8.5 + big_db), hz, 8.4, 1.5e-5)


def spout():
    bubbles = fizz(TRICKLE, count=900, crowding=0.94) + fizz(SPUTTER, count=1500, crowding=2.36)
    return bubbles + pops(GLUGS, cycles=4, spread=0.23, smear_s=.002, plus_db=-5)


def wind_puffs():
    gate = np.zeros((2, N))
    for s, db, pan_db, length in PUFFS:
        u = np.arange(0, 1, 1 / (length * SR))
        shape = ratio_of_db(db - 14.0 * u) * np.minimum(u / 0.019, 1)
        gate += mix(s, shape * ratio_of_db([[min(pan_db, 0)], [min(-pan_db, 0)]]))
    return gate * unit(coloured(rng.standard_normal((2, N)), WIND_COLOUR))


def fat_drops():
    s, db, splat_db = np.transpose(FAT_DROPS)
    after = rng.random((len(s), 3)).T * [[0], [1], [1]]
    db = (db - 11 * (after > 0) - 6 * after).ravel()
    s = (s + 0.0098 * after).ravel()
    blows = np.bincount((s * SR).astype(int), ratio_of_db(db + 20.5), N) * np.ones((2, 1))
    thumps = off_ground(coloured(coloured(blows, LONE_COLOUR), FABRIC_COLOUR))
    s, db = np.repeat([s, db + np.tile(splat_db, 3)], 3, axis=1)
    late, pitch = rng.random((len(s), 2)).T
    at = ((s + 0.00367 * late) * SR).astype(np.int64)
    return thumps + grains(at, ratio_of_db(db - 13.0), 1550 * 1.85 ** pitch, 3.1, 2e-5)


def scene():
    water = spray() + drops_on_leaves() + gouts() + spout() + fat_drops()
    can = can_gulps() + can_knock()
    return aside(water, over_time(LANDING)[0]) + aside(can, .3) + garden_hum() + wind_puffs()


def roll_off(x):
    return signal.sosfilt(signal.butter(12, 16800, fs=SR, output="sos"), x)


def record(dry):
    size = next_fast_len(N)
    hz = np.fft.rfftfreq(size, 1 / SR)
    difference = ratio_of_db(along(PORT_BALANCE, hz)) * np.exp(1j * along(PORT_LEAD, hz))
    ports = difference ** np.array([[.5], [-.5]]) * (hz < 15900)
    heard = irfft(rfft(dry, size) * ports, size)[:, :N]
    return roll_off(heard)


dry = scene()
out = record(dry)
output_pcm(out)
```